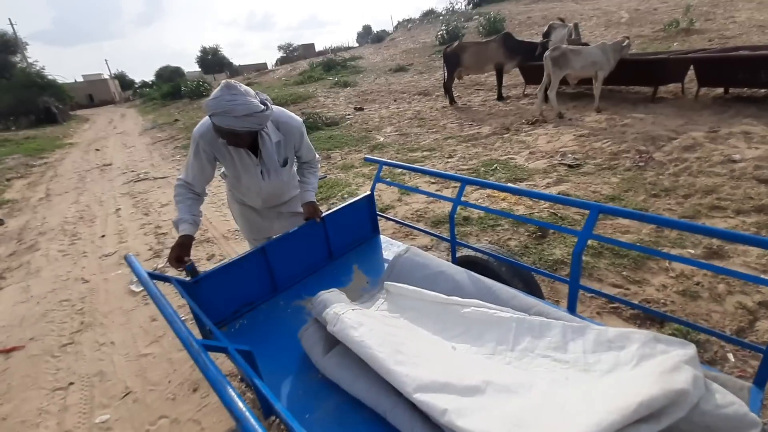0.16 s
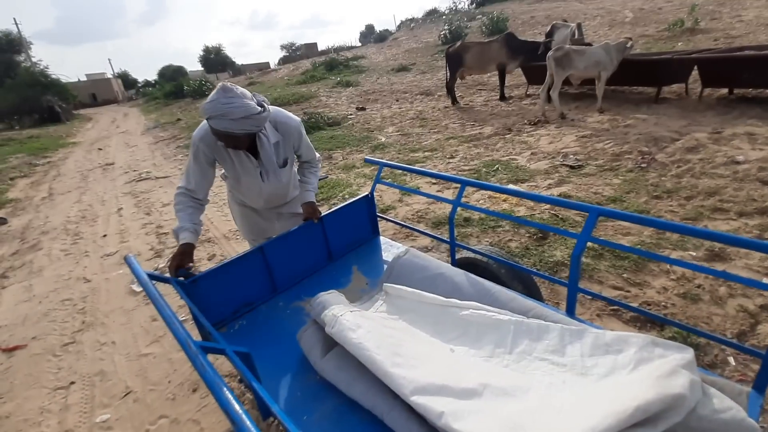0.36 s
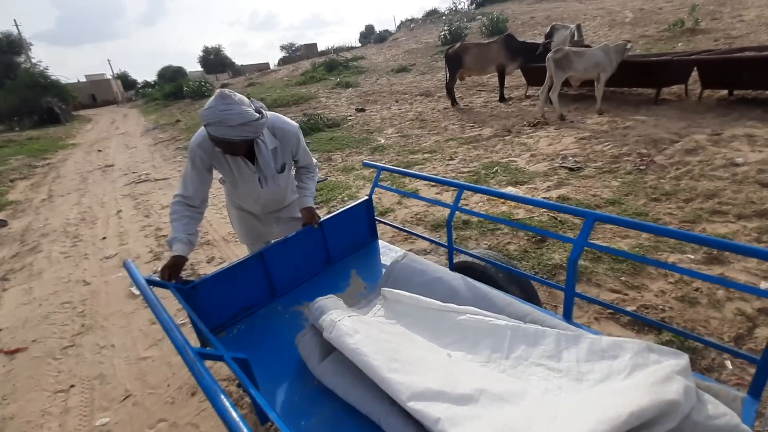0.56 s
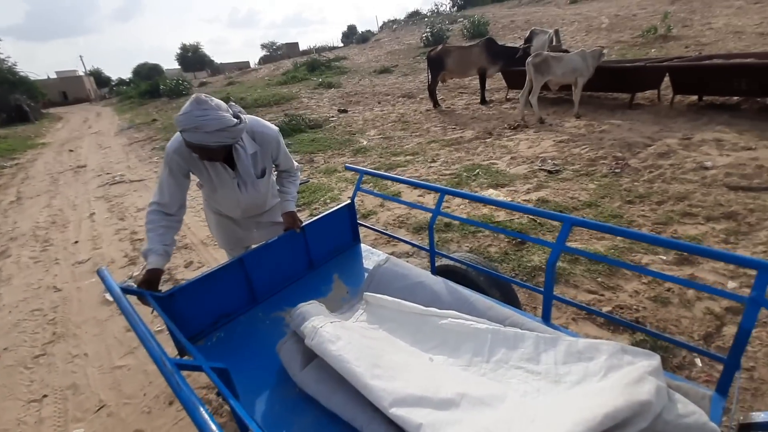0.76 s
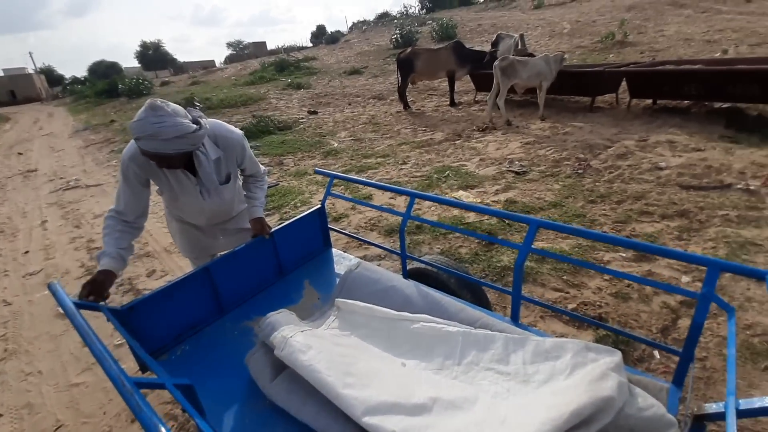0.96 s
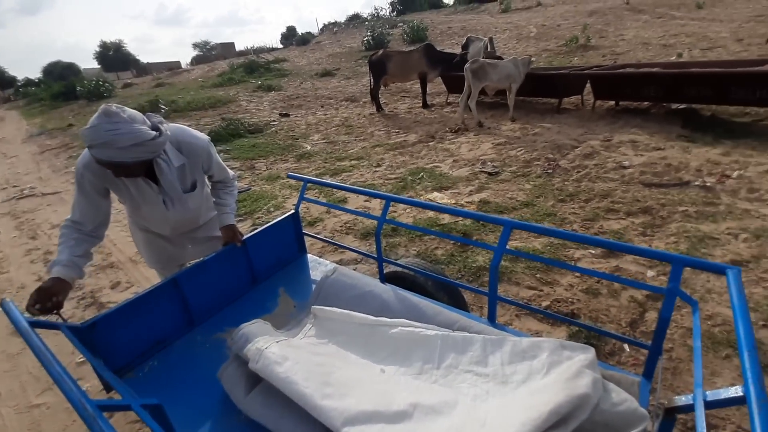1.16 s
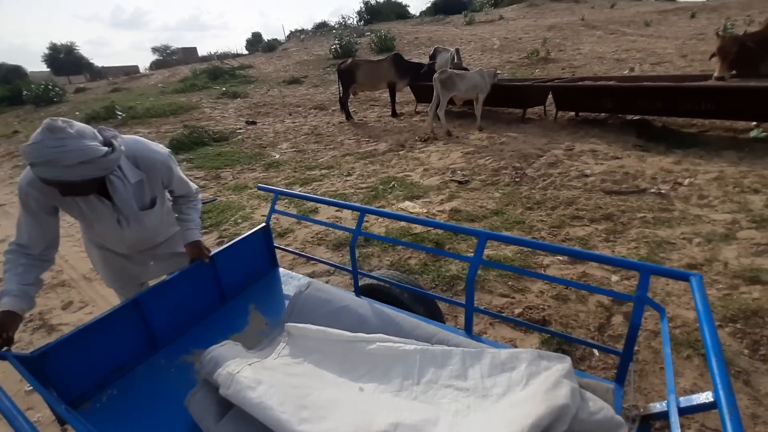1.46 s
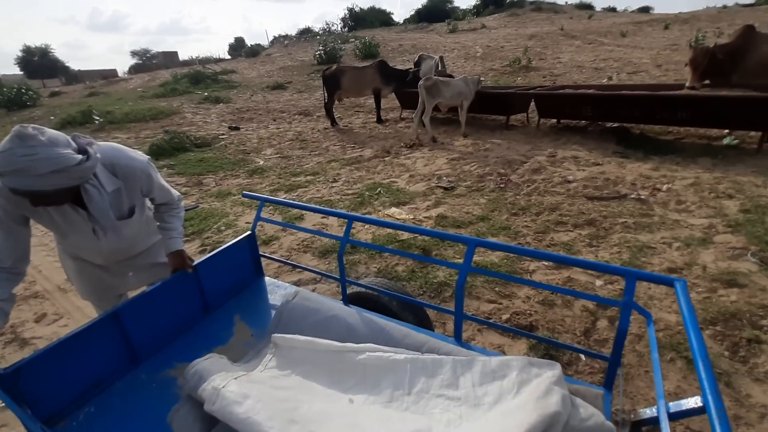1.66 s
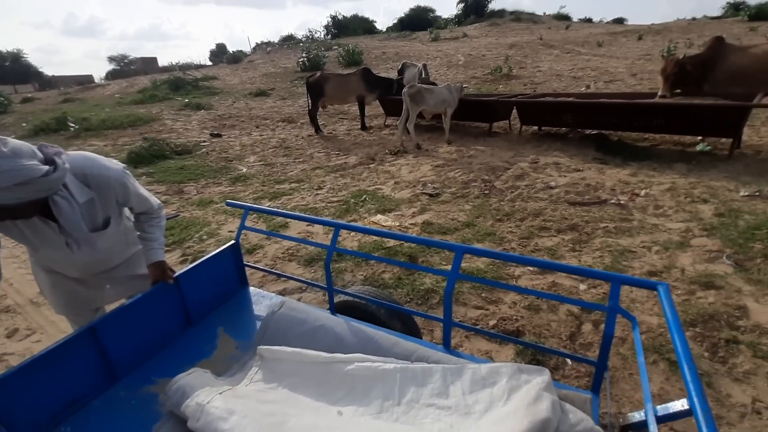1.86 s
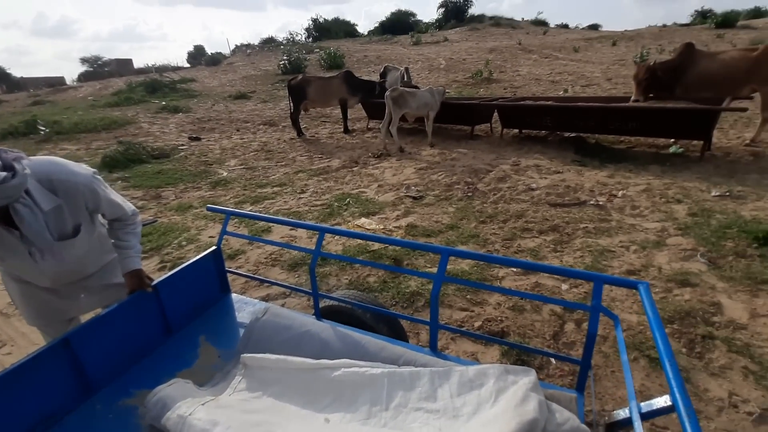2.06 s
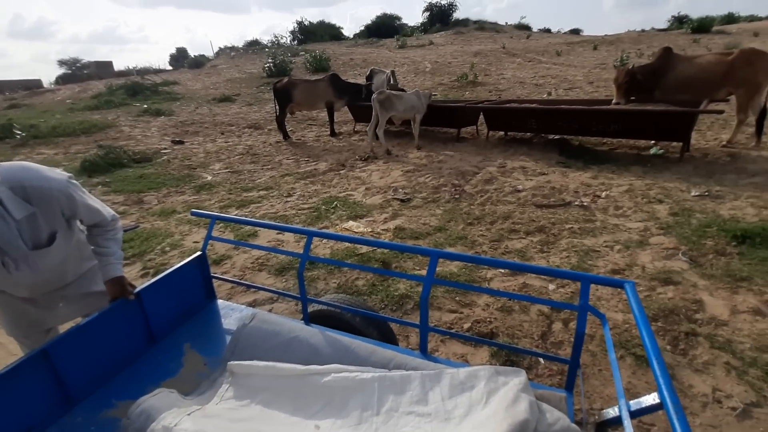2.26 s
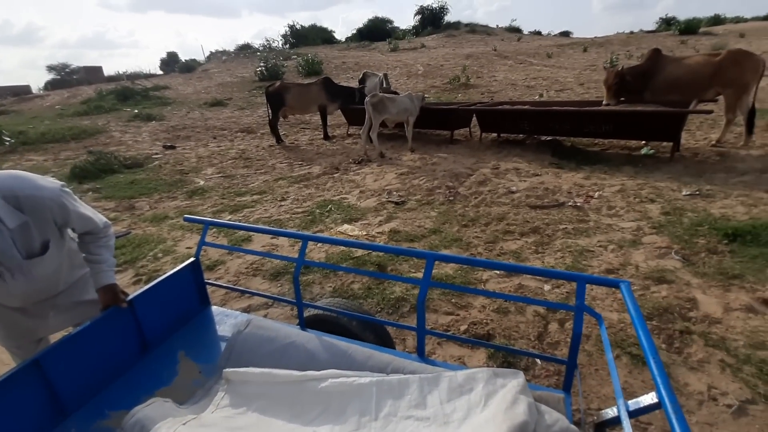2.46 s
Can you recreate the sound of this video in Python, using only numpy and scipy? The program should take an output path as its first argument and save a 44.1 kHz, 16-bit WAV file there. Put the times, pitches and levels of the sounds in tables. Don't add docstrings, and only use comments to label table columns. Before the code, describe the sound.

A steel hand cart clatters close by in an open yard. A low bed hum swells from 0.1 s into a bright, hollow tailgate slam at 0.26-0.4 s, with a latch clank and thuds after. A second sharp bang comes at 0.78 s, ringing down by 1 s. Light knocks follow at 1.4-1.6 s, a tiny tink at 1.8, then latch rattles and soft bumps at 2.1-2.5 s, over faint sand scuffing, wind and distant drone.

```python
import sys
import numpy as np
from scipy import signal
from scipy.fft import rfft, irfft
from scipy.io import wavfile
from scipy.ndimage import uniform_filter1d, map_coordinates

SR = 44100
rng = np.random.default_rng(int(sys.argv[2]) if len(sys.argv) > 2 else 0)


def materialize(psi):
    bounded = np.clip(np.atleast_2d(psi).T, -1, 1)
    quanta = np.round(bounded * 32767).astype(np.int16)
    wavfile.write(sys.argv[1], SR, quanta)


def nominal_scale(level):
    x = np.asarray(level, float) / 20
    return 10 ** x


N = 114660

# [t/s, rail ring level/dB, bed boom level/dB, panel clang level/dB, chatter/s]
GATE_HITS = [(0.001, -53, -43, -72.5, 0.008), (0.2614, -28.5, -16.5, -40, 0.0078),
             (0.284, -19, -20, -22.5, 0.0052), (0.2897, -23, -32, -19.5, 0.0063),
             (0.2992, -9.5, -27.5, -22, 0.00095), (0.3052, -8, -35, -20, 0.0021),
             (0.3105, -23, -18, -23.5, 0.001), (0.322, -18.5, -31, -30.5, 0.018),
             (0.334, -26, -32.5, -28.5, 0.0013), (0.346, -22, -36.5, -28.5, 0.0078),
             (0.3602, -24, -26.5, -24, 0.0095), (0.395, -33.5, -27, -37.5, 0.055),
             (0.4193, -56, -30.5, -49.5, 0.0079), (0.4837, -49, -30, -46, 0.0039),
             (0.5337, -66.5, -31.5, -41, 0.0019), (0.609, -41, -29.5, -33, 0.0043),
             (0.633, -36.5, -41, -37.5, 0.029), (0.7103, -34.5, -34, -36.5, 0.0043),
             (0.7765, -13.5, -35, -25, 0.0018), (0.7789, -13, -32.5, -23, 0.007),
             (0.7844, -10, -21, -18.5, 0.011), (0.7982, -21.5, -33, -30.5, 0.03),
             (0.9487, -49, -41.5, -83, 0.012)]
# [t/s, rail ring level/dB, bed boom level/dB, panel clang level/dB, chatter/s]
ROLL_HITS = [(1.4083, -32.5, -44.5, -47, 0.0097), (1.4454, -56, -40, -49, 0.013),
             (1.548, -52.5, -45, -51.5, 0.014), (1.5728, -22, -34, -33.5, 0.0044),
             (1.7992, -72, -48, -61, 0.011), (2.117, -55, -29.5, -47.5, 0.003),
             (2.12, -29, -28.5, -35.5, 0.0058), (2.1494, -69, -34.5, -46.5, 0.038),
             (2.2012, -30, -33, -36, 0.0015), (2.2308, -40, -32.5, -33.5, 0.031),
             (2.258, -41.5, -43, -30.5, 0.024), (2.2761, -30, -33.5, -29, 0.0096),
             (2.2938, -54, -24.5, -37, 0.0045), (2.362, -47, -32.5, -55, 0.014),
             (2.471, -52, -39.5, -44, 0.0063), (2.4792, -41.5, -35, -45, 0.003)]
# [f/Hz, level/dB, t60/s]
BED_MODES = [(104.6, -10.5, 0.33), (153.4, -7, 0.055), (212.8, 2.5, 0.43), (268.5, -10.5, 0.35),
             (295.5, -4, 0.58), (382.7, 0, 0.27)]
# [f/Hz, level/dB, t60/s]
PANEL_MODES = [(529.7, -4, 0.32), (713.6, 0.5, 0.17), (902, -3, .15), (1043, 3, 0.2), (1172, -5, .17),
               (1350, -8, .15), (1843, 2.5, .15)]
# [f/Hz, level/dB, t60/s]
TAILGATE_MODES = [(3700, -2, .09), (4860, -3, .1), (7500, -5, .08), (8560, 3, .1), (10275, -8, .09),
                  (12900, -2, .06)]
# [f/Hz, level/dB, t60/s]
SIDE_RAIL_MODES = [(3710, -17.5, .07), (5020, -12, .1), (5100, 6.5, 0.089), (5490, -3, 0.12),
                   (6100, -26, 0.17), (7560, 12, 0.049), (8790, -7, 0.041), (9040, 13, 0.036),
                   (12920, -7, 0.093)]
# [f/Hz, level/dB]
BED_CROWD = [(90, -18), (200, 5), (450, -2.5), (800, -15), (1500, -33.5)]
# [f/Hz, level/dB]
PANEL_CROWD = [(330, -28.5), (500, -7), (900, 2.5), (2200, 3), (4200, -13), (7000, -21), (12000, -59.5)]
# [f/Hz, level/dB]
RAIL_CROWD = [(1500, -13.5), (3000, 1.5), (4500, -3.5), (8500, -1.5), (13000, -7), (15300, -13.5),
              (15900, -61.5)]
# [f/Hz, t60/s]
CROWD_T60 = [(300, 0.31), (1500, 0.21), (4000, 0.097), (16000, 0.062)]
# [t/s, level/dB]
SHAKE = [(0, -38.5), (.07, -73), (.15, -44), (.5, -43), (.75, -32), (1.0, -43.5), (1.2, -59), (1.4, -57.5),
         (1.75, -61.5), (1.95, -55.5), (2.1, -46), (2.6, -42)]
# [t/s, level/dB]
RUSTLE = [
    (0, -81),
    (.03, -77),
    (.17, -77.5),
    (.25, -62.5),
    (.3, -87.5),
]
# [f/Hz, level/dB]
CLOTH = [(1200, -20.5), (3000, 3), (3600, -11), (12000, -19.5)]
# [t/s, level/dB]
SCUFF = [(0, -94), (.15, -83), (.24, -64), (.9, -63), (1.08, -63.5), (1.17, -76), (1.3, -71.5), (1.4, -78),
         (1.65, -63), (1.95, -60.5), (2.08, -78), (2.6, -61.5)]
# [f/Hz, level/dB]
SAND = [(700, -9.5), (1100, -4.5), (1600, 3), (2150, 1), (2600, -25), (4000, -26.5)]
# [f/Hz, level/dB]
AIR = [(12, -45), (20, -18), (104, 1), (285, -24.5), (718, -30.5), (1190, -30), (2670, -46), (8890, -35.5),
       (16000, -65)]
# [t/s, level/dB]
WIND = [(0, -58), (.2, -47.5), (.5, -49), (1.3, -55.5), (1.9, -67), (2.0, -50.5), (2.1, -46.5), (2.19, -37),
        (2.28, -42.5), (2.6, -50.5)]
# [f/Hz, level/dB]
GUST = [(20, -18.5), (45, -1), (70, 18.5), (110, -1.5), (200, -46.5)]
# [f/Hz, level/dB]
DRONE = [(60, 9.5), (105, 9), (170, -51.5)]
# [t/s, f/Hz, level/dB]
HUM = [
    (.1, 219.3, -47),
    (.17, 221.6, -50.5),
    (.215, 234, -33.5),
    (.25, 222, -24.5),
    (.275, 195, -34),
    (.3, 198, -25.5),
]
# [t/s, f/Hz, level/dB]
THUDS = [(.285, 548, -17.5), (.286, 671, -21.5), (0.293, 165.4, -16.5), (.303, 1950, -26.5),
         (0.307, 189, -12.5), (0.348, 116, -21.5), (.375, 312.5, -17), (0.389, 264.4, -19),
         (0.426, 243, -36), (0.463, 259, -22.5), (.52, 225, -28.5), (.534, 740, -29.5), (.61, 710, -24.5),
         (.611, 520, -22), (0.611, 1160, -26), (0.633, 530, -32.5), (.713, 710, -36.5),
         (.781, 207.2, -16.5), (0.783, 382, -18), (.818, 331.6, -14), (0.842, 267, -26), (.87, 445, -23),
         (.91, 284, -22.5), (1.0, 107.8, -34), (1.412, 216, -32.5), (1.416, 310, -33.5), (1.449, 216, -26),
         (1.575, 1910, -43), (1.82, 730, -43), (2.122, 516, -27.5), (2.124, 718, -29.5),
         (2.143, 327, -24.5), (2.148, 536, -25), (2.282, 404, -22), (2.303, 216, -29), (2.307, 320, -36),
         (2.366, 318, -29)]
# [f/Hz, t60/s]
THUD_T60 = [(100, .14), (220, .14), (400, .09), (2000, .06)]
# [t/s, level/dB]
LATCH_HITS = [(.419, -10.5), (1.573, -25), (2.126, -26.5), (2.196, -20), (2.2026, -5.5), (2.215, -15.5),
              (2.235, -21), (2.25, -20), (2.2635, -16), (2.2909, -14), (2.31, -32)]
# [f/Hz, level/dB, t60/s]
LATCH_MODES = [(1911, -8, .04), (2143, -6, .04), (2720, -4, .035), (2940, 1, .04), (3200, -2, .03),
               (3472, -1, .035), (3750, -3, .04)]
# [t/s, level/dB, chatter/s]
TINK = (1.799, -46, .022)
# [f/Hz, level/dB, t60/s]
BRACKET_MODES = [(820, -6, .03), (980, 0, .045), (1080, 0, .04), (1200, -2, .035), (3900, -25, .025),
                 (5000, -24, .03)]
# [t/s, lead/s]
LEAD = [
    (0, 0.00017),
    (1, 0.00025),
    (2.6, 0.00026),
]
# [f/Hz, level/dB]
PORTS = [(500, -0.5), (1500, -0.5), (4000, -1), (6000, -12), (8500, 6), (14000, 5.5)]

SAME_BED, SAME_PANEL, SAME_RAIL = 0.995, 0.72, 0.5
RAIL_CROWD_DB = 7.5
LUMPY_DB = 1.5


def evened(x):
    return x / np.sqrt(np.mean(x ** 2) + 1e-20)


def read(points, hz):
    f, value = np.transpose(points)
    return np.interp(np.log(hz + 1), np.log(f + 1), value)


def curve(points, axis=1):
    return np.interp(np.arange(N) / SR, np.array(points)[:, 0], np.array(points)[:, axis])


def noise(colour, same, patchy_db):
    hz = np.fft.rfftfreq(1024, 1 / SR)
    a, b, c, d, patch = rng.standard_normal((N // 256 + 5, 513, 5)).T
    patch = uniform_filter1d(patch, size=10, axis=0)
    patch = evened(uniform_filter1d(patch, size=10, axis=1))
    left = a + 1j * b
    right = same * left + np.sqrt(1 - same ** 2) * (c + 1j * d)
    gain = nominal_scale(read(colour, hz)[:, None] + patchy_db * patch)
    sound = signal.istft(np.array([left, right]) * gain, nperseg=1024, noverlap=768)[1]
    return evened(sound[:, :N])


def body(modes, same, crowd=None, dense_db=0, swell_s=1e-4, size=128):
    hz, db, t60 = np.transpose(modes)
    t = np.arange(SR // 2) / SR
    rings = np.exp((2j * np.pi * hz[:, None] - np.log(1000) / t60[:, None]) * t)
    u, v, w, spot = rng.standard_normal((len(hz), 4, 4)).T
    apart = np.sqrt(1 - same ** 2)
    left = np.exp(2j * u)
    right = same * left + apart * (v + 1j * w) / np.sqrt(2)
    spot_gain = nominal_scale(db + 5 * spot)
    out = ((np.array([left, right]) * spot_gain) @ rings).imag
    out = out / np.sqrt((out ** 2).sum(2).mean())
    if crowd:
        a, b = rng.standard_normal((2, 4, len(t)))
        f, s, z = signal.stft(np.array([a, same * a + apart * b]), SR, nperseg=size)
        fall_db = -60 * s / read(CROWD_T60, f)[:, None]
        late_db = -13 + fall_db / 1.8
        z = z * nominal_scale(read(crowd, f))[:, None] * (nominal_scale(fall_db) + nominal_scale(late_db))
        more = signal.istft(z, SR, nperseg=size)[1][:, :, :len(t)]
        out = out + nominal_scale(dense_db) * more / np.sqrt((more ** 2).sum(2).mean())
    out = out * (1 - np.exp(-t / swell_s)) ** 2
    return out / np.sqrt((out ** 2).sum(2).mean(0))[:, None]


def chatter(s, length, rise):
    clicks_per_s, spread_db = 3000, 3.5
    t = np.arange(6000) / SR - (s * SR % 1) / SR
    u, e = rng.random((2, 6000))
    sign = np.sign(u * SR % 2 - 1)
    clicks = (u < clicks_per_s / SR) * nominal_scale(-spread_db * np.log(e + 0.00026)) * sign
    clicks[1] = 2
    x = clicks * np.clip(t / rise, 0, 1) * np.exp(-t / max(length, 1e-3))
    return x / np.linalg.norm(x)


def add(mix, s, sound):
    part = mix[int(s * SR):][:len(sound)]
    part += sound[:len(part)]


def ring_out(drive, part):
    return signal.fftconvolve(drive[None], part, axes=2)[:, :, :N].sum(1)


def jolted_cart():
    rails = body(TAILGATE_MODES, SAME_RAIL, RAIL_CROWD, RAIL_CROWD_DB)
    rails[:, 2:] = body(SIDE_RAIL_MODES, SAME_RAIL, RAIL_CROWD, RAIL_CROWD_DB)[:, 2:]
    bed = body(BED_MODES, SAME_BED, BED_CROWD, 0.17, swell_s=0.0076, size=1024)
    panels = body(PANEL_MODES, SAME_PANEL, PANEL_CROWD, 2.5, swell_s=0.00042, size=256)
    rail_drive, bed_drive, panel_drive = np.zeros((3, 4, N))
    for k, (s, ring_db, boom_db, clang_db, length) in enumerate(GATE_HITS + ROLL_HITS):
        hit = chatter(s, length, 0.00015)
        shove = abs(chatter(s, 0.0012, 0.0001))
        rail_spot = k % 2 + 2 * (k >= len(GATE_HITS))
        add(rail_drive[rail_spot], s, nominal_scale(ring_db + 16) * hit)
        add(bed_drive[k % 4], s, nominal_scale(boom_db + 28) * shove)
        add(panel_drive[k % 4], s, nominal_scale(clang_db + 30.5) * hit)
    bed_drive += nominal_scale(curve(SHAKE) - 11) * rng.standard_normal((4, N))
    return ring_out(rail_drive, rails) + ring_out(bed_drive, bed) + ring_out(panel_drive, panels)


def tarpaulin():
    return nominal_scale(curve(RUSTLE)) * noise(CLOTH, 0.2, 2.3)


def sand_scuff():
    return nominal_scale(curve(SCUFF)) * noise(SAND, 0.083, 2.8)


def yard_air():
    return nominal_scale(-62) * noise(AIR, 0.82, 0.84)


def wind():
    return nominal_scale(curve(WIND)) * noise(GUST, 0.1, LUMPY_DB)


def far_drone():
    return nominal_scale(-53) * noise(DRONE, SAME_BED, LUMPY_DB)


def bed_hum():
    t = np.arange(N) / SR
    fade_in = np.clip((t - HUM[0][0]) / 0.034, 0, 1)
    fade_out = np.clip((HUM[-1][0] - t) / 0.02, 0, 1)
    tone = np.sin(2 * np.pi * np.cumsum(curve(HUM)) / SR)
    return np.sqrt(2) * fade_in * fade_out * nominal_scale(curve(HUM, axis=2)) * tone


def thuds():
    out, t = np.zeros(N), np.arange(SR // 2) / SR
    rise = 1 - np.exp(-t / 0.003)
    for s, hz, db in THUDS:
        fall = nominal_scale(db - 60 * t / read(THUD_T60, hz))
        add(out, s, fall * rise * np.sin(2 * np.pi * hz * t))
    return out


def latch():
    drive = np.zeros((4, N))
    for k, (s, db) in enumerate(LATCH_HITS):
        add(drive[k % 4], s, nominal_scale(db) * chatter(s, 0.0054, 0.00046))
    return ring_out(drive, body(LATCH_MODES, SAME_PANEL))


def bracket():
    s, db, length = TINK
    drive = np.zeros(N)
    add(drive, s, nominal_scale(db + 32.5) * chatter(s, length, 0.0071))
    ring = body(BRACKET_MODES, SAME_PANEL, swell_s=0.00045)[:, 0]
    return signal.fftconvolve(drive[None], ring, axes=1)[:, :N]


def scene():
    near = jolted_cart() + tarpaulin() + sand_scuff()
    near = near + bed_hum() + thuds() + latch() + bracket()
    late = np.arange(N) - curve(LEAD) * SR
    right = map_coordinates(near[1], [late], order=3, mode="nearest")
    return np.array([near[0], right]) + yard_air() + wind() + far_drone()


def top_cut(x):
    return signal.sosfilt(signal.butter(12, 16520, fs=SR, output="sos"), x)


def record(dry):
    low_cut_hz, top_hz = 43.2, 15600
    hz = np.fft.rfftfreq(N, 1 / SR)
    ports = nominal_scale(np.outer([0.5, -0.5], read(PORTS, hz)))
    low_cut = (1j * hz / (low_cut_hz + 1j * hz)) ** 2
    top = 1 / (1 + (hz / top_hz) ** 80)
    mix = irfft(rfft(dry) * ports * low_cut * top, N)
    return top_cut(mix)


dry = scene()
out = record(dry)
materialize(out)
```